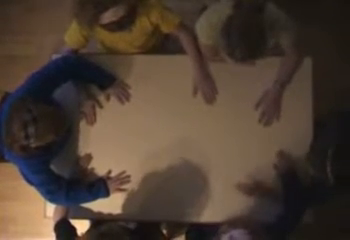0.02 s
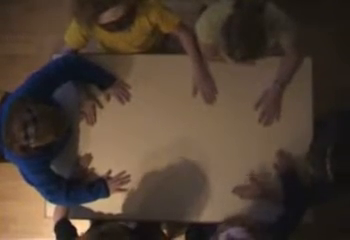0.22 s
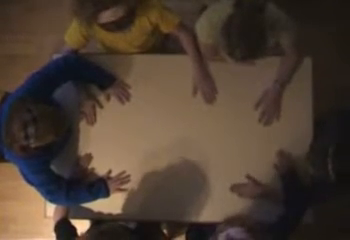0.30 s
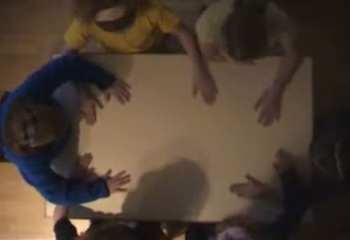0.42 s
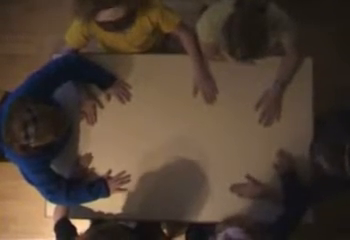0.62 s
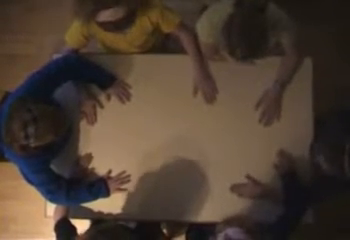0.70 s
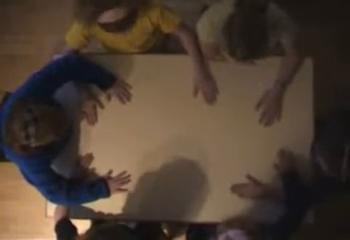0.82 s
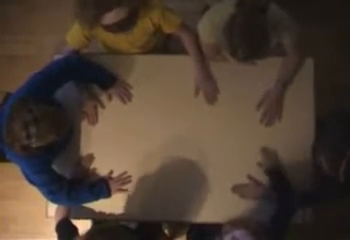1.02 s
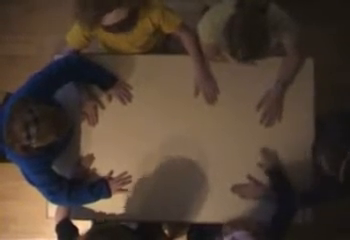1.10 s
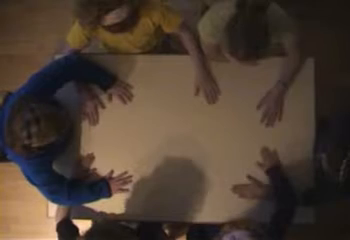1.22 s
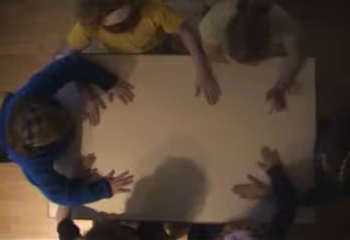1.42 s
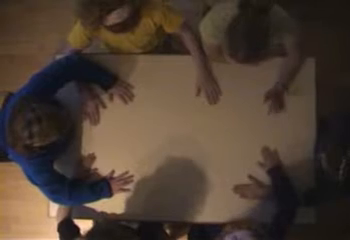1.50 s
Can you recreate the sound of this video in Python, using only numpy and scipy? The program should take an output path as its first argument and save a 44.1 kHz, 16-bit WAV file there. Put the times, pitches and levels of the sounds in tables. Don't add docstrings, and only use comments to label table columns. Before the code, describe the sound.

Bare palms smack a wooden table three times at an uneven pace in a live, echoing room.

```python
import sys
import numpy as np
from scipy import signal
from scipy.fft import rfft, irfft
from scipy.io import wavfile
from scipy.ndimage import uniform_filter1d

SR = 44100
rng = np.random.default_rng(int(sys.argv[2]) if len(sys.argv) > 2 else 0)


def undo_db(level):
    steps = np.asarray(level, float) / 20
    return 10 ** steps


def to_wav(s):
    ch = np.atleast_2d(s).T
    pcm = np.round(np.clip(ch, -1, 1) * 32767)
    wavfile.write(sys.argv[1], SR, pcm.astype(np.int16))


N = 68355

# frequency in Hz, level in dB.
COLOURS = [
    [(60, 0), (240, -1), (500, -11.5), (2110, -17.5), (2700, -26), (5500, -29.5), (10000, -32.5),
     (14500, -31)],
    [(60, -9), (560, -6), (730, -6), (1250, -5), (1970, -20.5), (5300, -29.5), (7500, -33.5),
     (14500, -33.5)],
    [(60, -9), (300, -1.5), (1430, -7.5), (2600, -16.5), (3400, -30.5), (5200, -28.5), (8600, -26.5),
     (14500, -31)],
]
BAND_HZ = 690


def evened(x):
    return x / np.sqrt(np.mean(x ** 2) + 1e-20)


def read(points, hz):
    f, value = np.transpose(points)
    return np.interp(np.log(hz + 1), np.log(f + 1), value)


def add(mix, start_s, sound):
    at = round(start_s * SR)
    sound = sound[:, max(-at, 0):]
    part = mix[:, max(at, 0):][:, :sound.shape[1]]
    part += sound[:, :part.shape[1]]


def paired(x, likeness, gain):
    n = x.shape[1]
    first, second = rfft(x)
    c = np.clip(read(likeness, np.fft.rfftfreq(n, 1 / SR)), 0, 1)
    right = c * first + np.sqrt(1 - c ** 2) * second
    return irfft(gain * np.array([first, right]), n)


def room(colour):
    # frequency in Hz, t60 in s.
    decay = [(60, 0.93), (150, 0.61), (400, 0.56), (1000, 0.69), (2500, 0.67), (5000, 0.85), (8000, 0.49),
             (13000, 0.3)]
    # frequency in Hz, left-right likeness 0-1.
    room_likeness = [(200, 1), (1000, 0.97), (2700, .88), (5500, 0.85), (9500, 0.68), (13000, 0.43)]
    rise_s = 0.009
    taps = np.zeros((2, SR))
    at = np.arange(0, SR - 16, 16) + rng.integers(0, 16, (2, (SR - 1) // 16))
    np.put_along_axis(taps, at, rng.choice([-1., 1.], at.shape), 1)
    gain = undo_db(read(colour, np.fft.rfftfreq(SR, 1 / SR)))
    taps = evened(paired(taps, room_likeness, gain))
    hz, t, z = signal.stft(taps, SR, nperseg=512)
    fade = undo_db(-60 * t / read(decay, hz)[:, None])
    tail = signal.istft(z * fade, SR, nperseg=512)[1][:, :SR]
    return tail * (1 - np.exp(-np.arange(SR) / SR / rise_s))


def earlier_tail():
    mix = np.zeros((2, N))
    add(mix, -0.3, undo_db(-20) * room(COLOURS[0]))
    return mix


def camera():
    # frequency in Hz, level in dB.
    hiss_colour = [(40, -6.5), (130, -3), (350, -6), (1000, -11), (2200, -16), (7000, -19.5), (8700, -13),
                   (12400, -20)]
    # frequency in Hz, left-right likeness 0-1.
    hiss_likeness = [(200, 0.73), (1000, 0.79), (5500, 0.62), (9500, 0.18), (13000, 0.57)]
    orders = [1, 3.5, 16, 30, 42, 48, 49, 60, 66, 72, 74, 78, 85.5, 89, 90, 91, 92, 96, 97, 101, 103, 104,
              107]
    order_db = [-72, -66.5, -77.5, -74, -78, -91, -73, -84, -71, -73, -101, -70.5, -68, -81, -68, -96, -67,
                -95, -70, -69, -70, -85, -77]
    motor_hz, hiss_db = 95.14, -53.5
    hz, t = np.fft.rfftfreq(N, 1 / SR), np.arange(N) / SR
    hiss = evened(paired(rng.standard_normal((2, N)), hiss_likeness, undo_db(read(hiss_colour, hz))))
    whine = np.zeros((2, N))
    for order, db in zip(orders, order_db):
        phase, skew = rng.random(2)
        turns = order * motor_hz * t + phase + np.array([[0], [0.06 * skew]])
        whine += np.sqrt(2) * undo_db(db) * np.sin(2 * np.pi * turns)
    return undo_db(hiss_db) * hiss + whine


def crack(length_s, peaks):
    # frequency in Hz, left-right likeness 0-1.
    direct_likeness = [(200, 0.59), (1000, 1), (2700, .96), (5500, 0.87), (9500, 0.73), (13000, 0.8)]
    patter_s, patter_db = 0.0019, -12
    fizz_db, fizz_top_hz = -25.5, 6000
    t = np.arange(2048) / SR - 0.01
    burst = np.exp(-(t / length_s) ** 2) + undo_db(patter_db) * np.exp(-abs(t) / patter_s)
    hz = np.fft.rfftfreq(2048, 1 / SR)
    gain = undo_db(fizz_db) / (1 + 1j * hz / fizz_top_hz)
    for k, (peak_hz, width_hz, db) in enumerate(peaks):
        gain = gain + (-1) ** k * undo_db(db) / (1 + 2j * (hz - peak_hz) / width_hz) ** 2
    click = 9.0 * (abs(t) == abs(t).min()) * np.array([[1], [0]])
    snap = paired(rng.standard_normal((2, 2048)) * burst + click, direct_likeness, gain)
    return snap / abs(snap).max()


def thump(modes):
    rise_s, right_lead_s = 0.00038, 0.00005
    t = np.arange(SR // 2) / SR
    t_ears = t + np.array([[0], [right_lead_s]])
    ring = sum(undo_db(db - 60 * t / t60_s) * np.cos(2 * np.pi * hz * t_ears) for hz, db, t60_s in modes)
    return ring * (1 - np.exp(-t / rise_s))


def rings(waves):
    rise_s, t60_s = 0.0082, 0.57
    t = np.arange(SR) / SR
    ring = np.zeros((2, SR))
    for hz, db in waves:
        phase, skew = rng.random(2)
        turns = hz * t + phase + np.array([[0], [0.015 * skew]])
        ring += undo_db(db - 60 * t / t60_s) * np.sin(2 * np.pi * turns)
    return ring * (1 - np.exp(-t / rise_s))


def slaps():
    lands_s = [
        .2123,
        .4388,
        1.1689,
    ]
    # crack lag in s, crack length in s, crack level in dB, room level in dB.
    hits = [
        (.0028, 0.0022, -9.5, -13.5),
        (0.00052, 0.0013, -5, -13),
        (0.00087, 0.00059, -5.5, -16),
    ]
    # frequency in Hz, level in dB, t60 in s.
    tops = [
        [(70, -25.5, .3), (125.2, -4.5, 0.17), (248, -29, 0.069), (292, -21.5, 0.37), (517, -12, 0.037),
         (955, -16.5, 0.029)],
        [(81.1, -32, 0.64), (131.6, -10, 0.12), (354, -9, 0.028), (515, -1, 0.021), (740, -14, 0.067),
         (924, -13, 0.082), (1176, -34, 0.11)],
        [(66.5, -28, 0.22), (145, -19, 0.1), (180, -15.5, 0.066), (220, -10, 0.061), (273, -11, 0.094),
         (348.5, -6, 0.051), (410, -16.5, 0.033), (1384, -11, 0.034)],
    ]
    # frequency in Hz, width in Hz, level in dB.
    cracks = [
        [(2740, 1500, 3.5), (3790, 1700, 1.5), (7660, 3600, -7), (11000, 2500, -26)],
        [(2220, 980, -3.5), (3170, 780, 2), (4830, 1440, 2.5), (8100, 3000, -16), (12100, 670, -21)],
        [(2660, 1140, -0.5), (4850, 1230, 0.5), (8500, 1900, -0.5), (11960, 1500, -8)],
    ]
    # frequency in Hz, level in dB.
    standing = [
        [(129, -25), (245, -25.5), (297, -28), (385, -26), (672, -36), (926, -30)],
        [(382, -26), (507, -29), (738, -20), (852, -32), (920, -21.5), (1025, -23.5), (1163, -22.5)],
        [(170, -34.5), (228, -25.5), (333, -25.5), (440, -39), (767, -28), (880, -27.5), (1380, -28)],
    ]
    echo_s = [0, .0062, .0122, .0150, .0245]
    # crack level in dB, thump level in dB.
    echoes = [
        (4.5, 1),
        (-13.5, -19),
        (-4.5, -6.5),
        (-9.5, -19),
        (-22, -23),
    ]
    room_start_s = 0.004
    mix = np.zeros((2, N))
    hands = zip(lands_s, hits, tops, cracks, COLOURS, standing)
    for land_s, (lag_s, length_s, crack_db, room_db), modes, peaks, colour, waves in hands:
        low = thump(modes)
        for delay_s, (snap_db, low_db) in zip(echo_s, echoes):
            add(mix, land_s + delay_s, undo_db(low_db) * low)
            snap = undo_db(crack_db + snap_db) * crack(length_s, peaks)
            add(mix, land_s + delay_s + lag_s - 0.01, snap)
        add(mix, land_s + room_start_s, undo_db(room_db) * room(colour) + rings(waves))
    return mix


def scene():
    return earlier_tail() + camera() + slaps()


def thinned(x):
    open_db = [-71, -65, -58, -46, -44]
    steady_top_hz = 12450
    hz, t, z = signal.stft(x, SR, nperseg=512, noverlap=384)
    band = np.floor((hz - steady_top_hz) / BAND_HZ)
    power = uniform_filter1d(2 * (abs(z) ** 2).mean(0) / 1.5, size=9, axis=1)
    is_open = np.tile(band[:, None] < 0, len(t))
    for k, db in enumerate(open_db):
        is_open[band == k] = power[band == k].sum(0) > undo_db(2 * db)
    return signal.istft(z * is_open, SR, nperseg=512, noverlap=384)[1][:, :N]


def low_pass(x):
    return signal.sosfilt(signal.butter(12, 15610, fs=SR, output="sos"), x)


def record(dry):
    # frequency in Hz, level in dB.
    ports = [(200, -.45), (1000, -.7), (2700, -.6), (5500, -1.9), (9500, -1.4), (13000, -.8)]
    mic_low_hz, edge_hz, limit = 59.4, 15600, 1.0
    hz = np.fft.rfftfreq(2 * N, 1 / SR)
    balance = undo_db(read(ports, hz) * np.array([[0.5], [-0.5]]))
    bass_cut = (1j * hz / (mic_low_hz + 1j * hz)) ** 2
    top_edge = np.clip((edge_hz - hz) / BAND_HZ, 0, 1)
    heard = irfft(rfft(dry, 2 * N) * balance * bass_cut * top_edge, 2 * N)[:, :N]
    limited = limit * np.tanh(heard / limit)
    return low_pass(thinned(limited))


dry = scene()
out = record(dry)
to_wav(out)
```